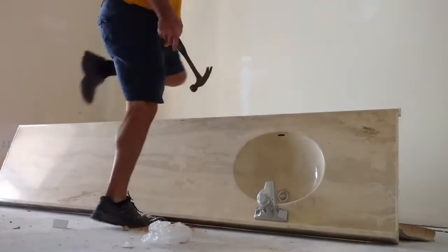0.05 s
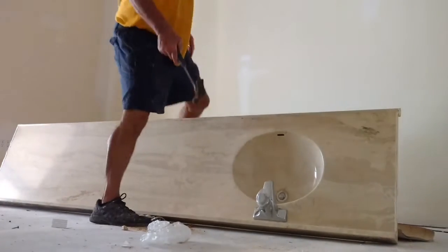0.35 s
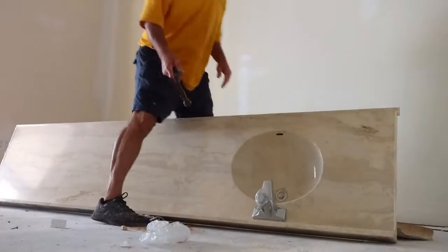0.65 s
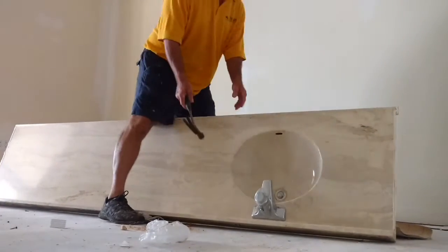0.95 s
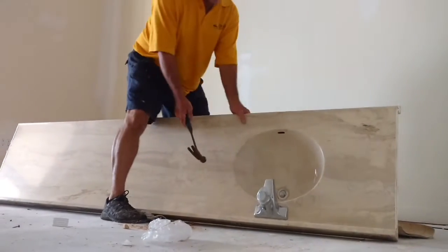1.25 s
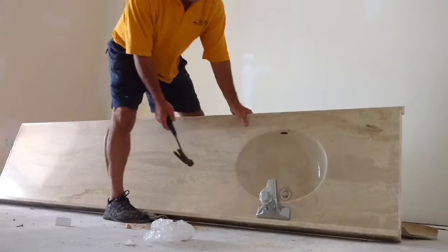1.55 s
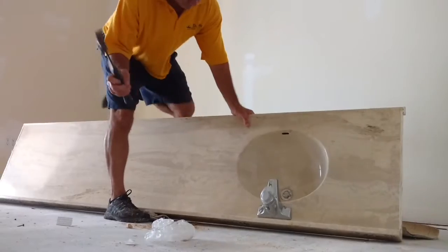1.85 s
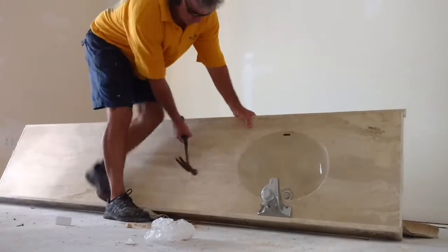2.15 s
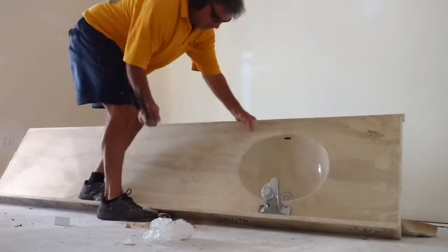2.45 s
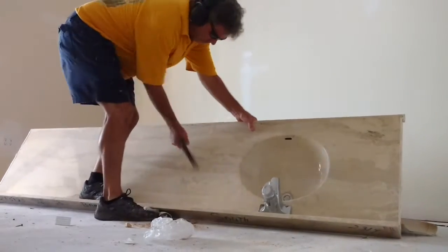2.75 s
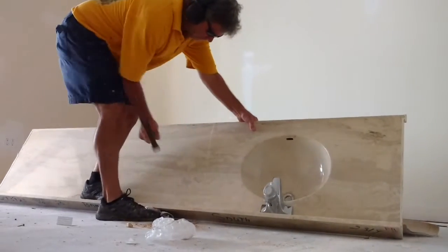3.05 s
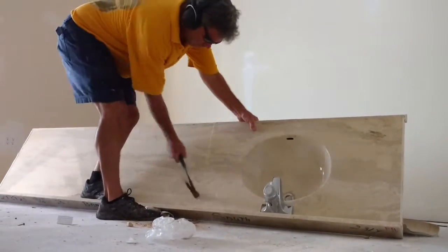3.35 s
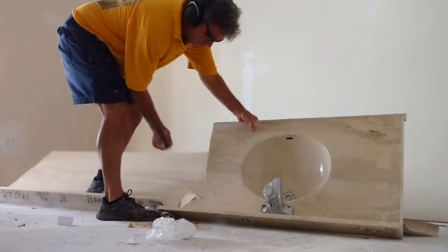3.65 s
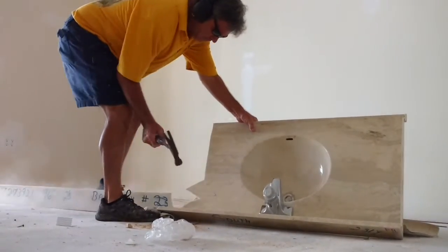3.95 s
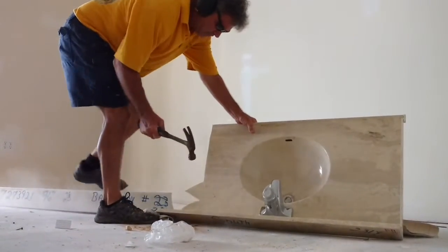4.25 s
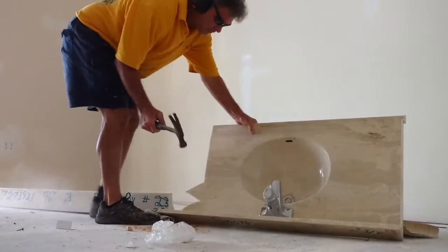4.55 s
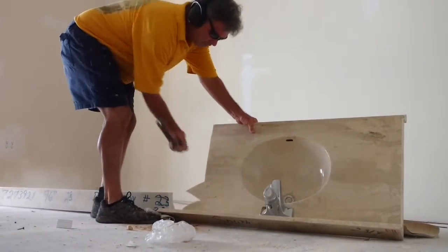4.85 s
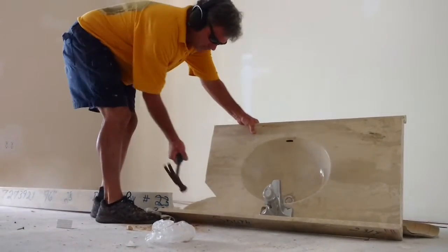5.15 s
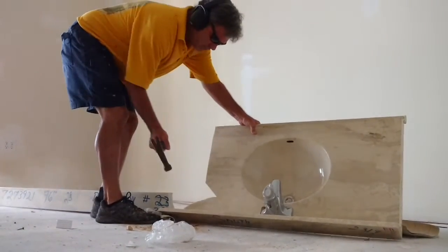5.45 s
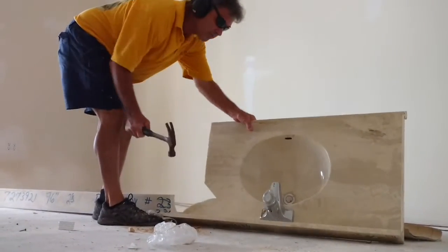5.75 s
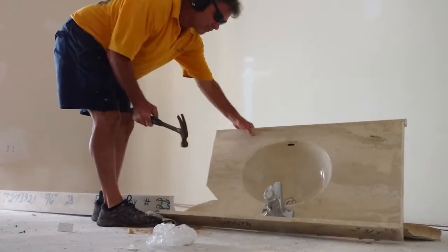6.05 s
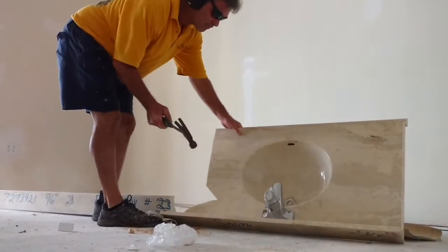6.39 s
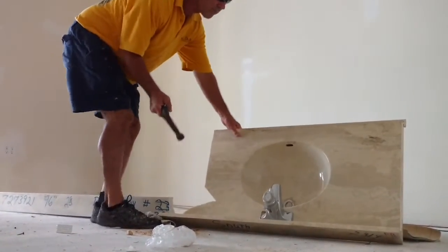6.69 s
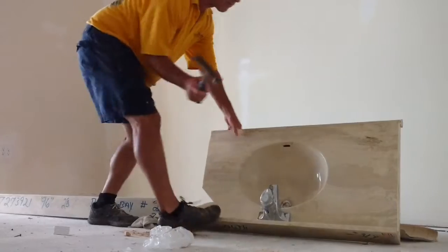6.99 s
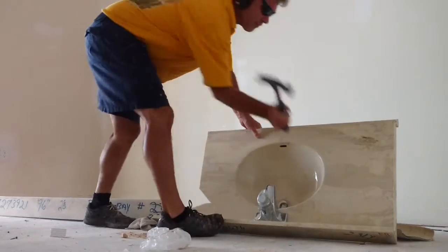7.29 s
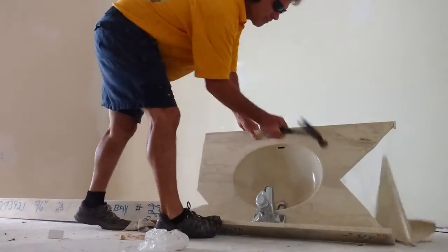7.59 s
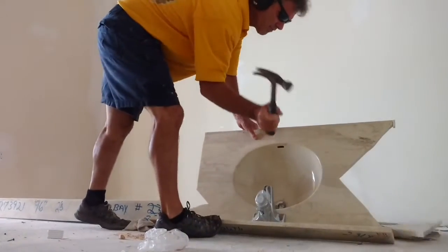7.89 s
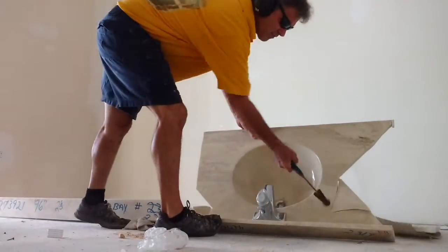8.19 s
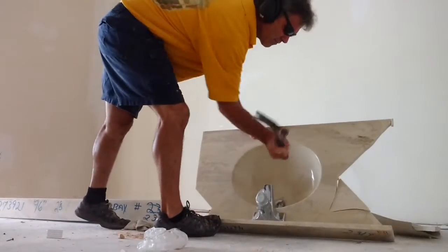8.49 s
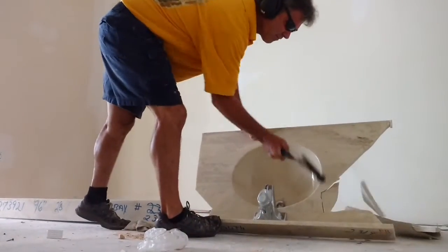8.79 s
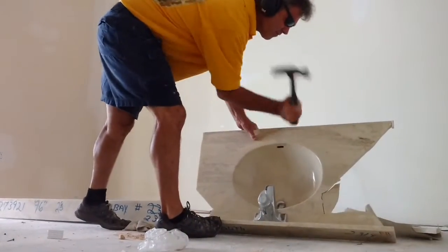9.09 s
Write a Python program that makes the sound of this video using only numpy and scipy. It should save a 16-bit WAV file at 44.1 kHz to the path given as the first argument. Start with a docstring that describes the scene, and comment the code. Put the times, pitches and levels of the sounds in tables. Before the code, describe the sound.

A hammer smashes a stone countertop in an empty, reverberant room, heard through a small microphone that distorts a little on the loudest hits. Gritty shoe scuffs, soft steps and rustling cloth come first. Four loud cracking blows follow, a slab section topples and bounces, and a lighter blow lands. The remaining piece rocks with low knocks, then three more sharp strikes ring out as a shard clatters on the floor.

```python
"""Shoes scuff on a gritty floor and clothes rustle in a bare, echoing room. Then a man breaks up a
cast-stone countertop with eight blows of a claw hammer: the slab cracks and rings, broken edges clack,
one half topples, the other rocks, shards drop. From where the microphone stands, the room is louder
than the direct sound. It is a small one: its port cuts evenly spaced notches and the blows overload it."""
import sys
import numpy as np
from scipy import signal
from scipy.fft import rfft, irfft, next_fast_len
from scipy.io import wavfile

SR = 44100
rng = np.random.default_rng(int(sys.argv[2]) if len(sys.argv) > 2 else 0)


def to_wav(sig):
    """Store sig (one row per channel, or 1-D mono) as 16-bit WAV at the path in sys.argv[1].

    Samples outside -1..1 are clipped; the rate is SR.
    """
    pcm = np.clip(np.atleast_2d(sig), -1, 1) * 32767
    pcm = np.round(pcm).astype(np.int16)
    wavfile.write(sys.argv[1], SR, pcm.T)  # frames by channels


N = 402633
PLACES = 4   # spots in the room, each with its own echoes
BURST = SR // 2   # samples in one short event
TIME = np.arange(BURST) / SR

# spectrum of stone cracking: f/Hz, level/dB
CRACK_COLOUR = [(40, -25), (130, -7.5), (260, 0), (500, 2), (900, 5), (1400, 1.5), (2000, -3.5),
                (3500, -10.5), (6200, -17.5), (8700, -25), (12000, -33), (16000, -40)]
# spectrum of a heavy piece knocking: f/Hz, level/dB
THUD_COLOUR = [(40, -11.5), (140, 4.5), (260, 12.5), (520, 8.5), (850, 4), (1400, -9.5), (2200, -13.5),
               (4000, -30), (8000, -38.5), (16000, -63.5)]


def from_db(db):
    """Decibels to amplitude."""
    return 10 ** (np.asarray(db) / 20)


def unit(x):
    """Scale to an energy of one."""
    return x / np.sqrt(np.sum(x ** 2) + 1e-20)


def burst(x, db, over_s=0.094):
    """Give a unit-energy sound the energy of a short stretch at the given level."""
    return from_db(db) * np.sqrt(over_s * SR) * x


def at_hz(points, hz):
    """Read a curve along a logarithmic frequency axis."""
    f, value = np.transpose(points)
    return np.interp(np.log(hz + 1), np.log(f), value)


def at_one_place(x):
    """A sound that comes from a single spot."""
    return np.eye(PLACES)[:, :1] * x


def add(track, s, sound):
    """Mix a sound in at a given time, dealing its parts to the places in random order."""
    start = max(round(s * SR), 0)
    track[:, start:start + sound.shape[-1]] += rng.permutation(sound)[:, :N - start]


def coloured(x, colour, bass_db=0, treble_db=0, bass_hz=550, treble_hz=1900, size=4096):
    """Causal filter of unit power gain with the given colour, then a bass and a treble shelf."""
    hz = np.fft.rfftfreq(size, 1 / SR)
    db = at_hz(colour, hz)
    db -= 10 * np.log10(np.mean(from_db(db) ** 2))
    db += bass_db / (1 + (hz / bass_hz) ** 4)
    db += treble_db * (1 - 1 / (1 + (hz / treble_hz) ** 4))
    cepstrum = irfft(np.log(from_db(db)))
    fold = 1 - np.sign(np.arange(size) - size // 2)   # minimum phase: nothing sounds early
    fold[0] = 1
    response = irfft(np.exp(rfft(cepstrum * fold)))[:size // 2]
    return signal.fftconvolve(x, response[None], axes=-1)[:, :x.shape[-1]]


def dying(x, t60s):
    """Let each band of a steady sound die away in its own time."""
    size = x.shape[-1]
    hz, t = np.fft.rfftfreq(size, 1 / SR), np.arange(size) / SR
    spectrum = rfft(x)
    centres, times = np.transpose(t60s)
    shares = [at_hz(np.c_[centres, row], hz) for row in np.eye(len(centres))]
    bands = [irfft(spectrum * share, size) for share in shares]
    return sum(band * from_db(-60 * t / t60) for band, t60 in zip(bands, times))


def mode(hz, t60, t=TIME):
    """A struck mode: a dying sine."""
    return np.sin(2 * np.pi * hz * t) * from_db(-60 * t / t60)


def grains(per_s, uneven_db):
    """Random clicks of uneven size, one row for each place they come from."""
    born = rng.random((PLACES, BURST)) < per_s / PLACES / SR
    return born * rng.choice([-1, 1], BURST) * from_db(uneven_db * rng.standard_normal(BURST))


def contact(spread_s, crackle_db):
    """One hard click, then a dying shower of tiny fractures all around it."""
    cracks = unit(grains(per_s=1200, uneven_db=5) * np.exp(-TIME / max(spread_s, 1e-3)))
    return unit(at_one_place(TIME == 0) + from_db(crackle_db) * cracks)


def room_tone(db=-64):
    """The faint, steady hush of the air."""
    # spectrum of the hush: f/Hz, level/dB
    hush_colour = [(30, -5), (120, -6.5), (500, -4.5), (1300, 0), (3000, -19), (8000, -28), (16000, -45)]
    return from_db(db) * coloured(rng.standard_normal((1, N)), hush_colour)


def room(places, direct_db=-3, early_db=-6, tail_gain=1.32, early_s=0.0097, build_s=0.0014):
    """Each spot reaches the microphone with its own wall echoes and tail; all share the standing waves."""
    # reverberation time by band: f/Hz, t60/s
    reverb_times = [(60, 0.63), (130, 0.64), (260, 0.85), (550, 1.094), (1300, 1.154), (2600, 0.8),
                    (5500, 0.81), (8500, 0.61), (14000, 0.37)]
    # strongest standing waves: f/Hz, level/dB, t60/s
    standing_waves = [(176, -32, 0.45), (269.5, -21.5, 0.76), (353, -33, 0.33), (456, -27.5, 1.5),
                      (499.5, -22.5, 1.5), (608.6, -28.5, 1.6), (682, -33.5, 0.78), (750, -23.5, 1.1),
                      (1262, -43, 0.72)]
    t = np.arange(3 * BURST) / SR
    shape = (PLACES, len(t))
    arrivals = rng.random(shape) < 500 / SR   # about 500 echoes a second
    echoes = arrivals * rng.standard_normal(shape) * np.exp(-t / early_s)
    tails = dying(rng.standard_normal(shape), reverb_times) * (1 - np.exp(-t / build_s))
    direct = from_db(direct_db) * (t == 0)
    ringing = sum(from_db(db) * unit(mode(hz, t60, t)) for hz, db, t60 in standing_waves)
    responses = [direct + ringing + from_db(early_db) * unit(echo) + tail_gain * unit(tail)
                 for echo, tail in zip(echoes, tails)]
    return sum(signal.fftconvolve(x, response)[:N] for x, response in zip(places, responses))


def clothes(fade_db_per_s=107.5):
    """Cloth rustles evenly through each spell of movement and fades on either side."""
    # spells of moving about: start/s, end/s, level/dB
    moves = [(0, 1.26, -53), (1.87, 2.25, -50.5), (7.1, 9.13, -59.5)]
    # spectrum of rubbing cloth: f/Hz, level/dB
    rustle_colour = [(30, 11), (80, -3), (200, 1.5), (500, -1), (1200, -3.5), (3500, -16), (7000, -18.5),
                     (11000, -26), (16000, -33.5)]
    t = np.arange(N) / SR
    level = sum(from_db(db - fade_db_per_s * np.abs(t - np.clip(t, start, end)))
                for start, end, db in moves)
    return at_one_place(level * coloured(rng.standard_normal((1, N)), rustle_colour))


def shoes():
    """Soles roll dense grit under a smooth stroke and come down with a dull thud."""
    # soles sliding: middle/s, half length/s, level/dB
    scuffs = [(0.265, 0.042, -29.5), (0.783, .08, -48), (0.971, 0.039, -34), (1.55, 0.038, -47),
              (6.06, .025, -63), (6.907, 0.053, -66.5)]
    # spectrum of rolling grit: f/Hz, level/dB
    scuff_colour = [(40, -18), (150, -10.5), (450, -2), (1000, -1.5), (2000, -4.5), (3500, -2.5),
                    (6200, -8), (9000, -14.5), (12000, -24.5), (16000, -41.5)]
    # soft footfalls: t/s, level/dB
    steps = [(.682, -51), (0.982, -40.5), (1.05, -42.5), (1.38, -56), (1.97, -33.5), (7.1, -64)]
    # spectrum of a footfall: f/Hz, level/dB
    step_colour = [(30, -36.5), (70, -21), (130, 2), (280, -5.5), (600, -22), (1500, -26), (16000, -80)]
    out = np.zeros((PLACES, N))
    for s, half_s, db in scuffs:
        grit = np.sqrt(BURST) * unit(grains(per_s=7000, uneven_db=1))
        stroke = np.exp(-((TIME - TIME.mean()) / half_s) ** 2)
        add(out, s - TIME.mean(), from_db(db) * coloured(grit * stroke, scuff_colour, treble_db=-3.5))
    for s, db in steps:
        add(out, s, burst(coloured(contact(spread_s=0.054, crackle_db=6.5), step_colour), db))
    return out


def clink(modes, uneven_db=2):
    """Every touch strikes each mode with a strength of its own."""
    tones = [from_db(db + uneven_db * rng.standard_normal()) * mode(hz, t60) for hz, db, t60 in modes]
    return at_one_place(unit(sum(tones)))


def debris(middling_chip_db=-52):
    """On the floor, chips snap underfoot, a shard clatters and clinks, a splinter tinkles."""
    # grit snapping under the soles: t/s, level/dB
    chips = [(0.2, -56), (.677, -42.5), (.866, -42.5), (6.234, -68.5), (7.057, -55), (7.265, -58)]
    # the shard lands and tips over: t/s, level/dB, rattling time/s
    shard_falls = [(8.0, -31.5, 0.012), (8.07, -40.5, 0.022), (8.207, -34.5, 0.021)]
    # its modes: f/Hz, level/dB, t60/s
    shard_modes = [(1100, -15, .25), (1140, -8, 0.21), (1542, 2, 0.31), (1875, 11, 0.12), (2905, 6, .12),
                   (3530, 9, 0.053), (4260, 9, 0.073), (6137, -25, .1), (6589, -24, .1), (9350, -30, 0.093)]
    # the splinter lands: t/s, level/dB
    splinter_falls = [(5.28, -62.5), (5.32, -62)]
    # its modes: f/Hz, level/dB, t60/s
    splinter_modes = [(10670, 7, .1), (10800, 0, .1), (12500, -3, 0.091), (14200, -5, .12)]
    out = np.zeros((PLACES, N))
    for s, db in chips:
        size_db = db - middling_chip_db   # a bigger chip rattles longer and is duller
        snap = contact(spread_s=0.0052 * from_db(0.9 * size_db), crackle_db=17.5)
        add(out, s, burst(coloured(snap, CRACK_COLOUR, bass_db=-2, treble_db=5.5 - 0.16 * size_db), db))
    for s, db, spread_s in shard_falls:
        clatter = coloured(contact(spread_s, crackle_db=8), CRACK_COLOUR, bass_db=-7, treble_db=4)
        add(out, s, burst(unit(clatter + from_db(-4) * clink(shard_modes)), db))
    for s, db in splinter_falls:
        add(out, s, burst(clink(splinter_modes), db))
    return out


def plate(mean_spacing_hz=14):
    """A broken plate rings in evenly dense modes, at new pitches on every strike."""
    # ringing time of the stone by band: f/Hz, t60/s
    ring_times = [(100, .2), (1000, .2), (2500, .05), (14000, .02)]
    bins = BURST // 2 + 1
    is_mode = rng.random(bins) < SR / BURST / mean_spacing_hz
    phases = np.exp(2j * np.pi * rng.random(bins))
    ring = unit(dying(irfft(is_mode * phases, BURST), ring_times))
    return at_one_place(ring)[::-1]   # it radiates away from the point struck


def struck_slab(colour, modes, spread_s, bass_db, treble_db, crackle_db=4.5, ring_db=-6):
    """A contact cracks, sets the plate's many modes going and brings out its main tones."""
    stone = unit(contact(spread_s, crackle_db) + from_db(ring_db) * plate())
    tones = sum(from_db(db) * unit(mode(hz, t60)) for hz, db, t60 in modes)
    return coloured(stone, colour, bass_db, treble_db) + at_one_place(tones)


def nudge(s=1.965, db=-41.5):
    """A leg nudges the whole slab, which hums."""
    # modes of the unbroken slab: f/Hz, level/dB, t60/s
    modes = [(263, 6, .3), (1400, -7.5, .25)]
    out = np.zeros((PLACES, N))
    hum = struck_slab(THUD_COLOUR, modes, spread_s=0.2, bass_db=-0.5, treble_db=11.5, crackle_db=15)
    add(out, s, burst(hum, db))
    return out


def broken_edges():
    """The freshly broken edges clack together."""
    # edges meeting: t/s, level/dB, treble/dB
    clacks = [(2.39, -19.5, -13.5), (4.07, -28, -5), (4.198, -26.5, -9), (5.315, -33, -2),
              (5.459, -40, -4.5)]
    # the modes they strike: f/Hz, level/dB, t60/s
    modes = [(1290, -20.5, .25), (1627, -11, 0.18)]
    out = np.zeros((PLACES, N))
    for s, db, treble_db in clacks:
        clack = struck_slab(CRACK_COLOUR, modes, spread_s=0.034, bass_db=-7, treble_db=treble_db)
        add(out, s, burst(clack, db))
    return out


def toppling_half(hard_landing_db=-17, ring_db_per_db=0.17):
    """The loose half slaps down on the floor and bounces; a softer landing cracks less and rings more."""
    # slap and bounces: t/s, level/dB
    landings = [(3.975, -15), (4.07, -24.5), (4.21, -30), (4.668, -45.5)]
    # modes of the loose half: f/Hz, level/dB, t60/s
    modes = [(609, -21.5, 0.28), (752, -7.5, .25), (864, -19.5, .25)]
    out = np.zeros((PLACES, N))
    for s, db in landings:
        lift_db = ring_db_per_db * (hard_landing_db - db)
        lifted = [(hz, mode_db + lift_db, t60) for hz, mode_db, t60 in modes]
        slap = struck_slab(THUD_COLOUR, lifted, spread_s=0.038, bass_db=-12.5, treble_db=3)
        add(out, s, burst(slap, db))
    return out


def rocking_half(rebound_s=0.11, loss_db=14, dulling_db=25):
    """The standing half rocks on its edge and each time drops back once, softer and duller."""
    # the edge bumps down: t/s, level/dB, treble/dB
    rocks = [(5.75, -35.5, 2), (6.205, -43.5, -5), (6.274, -31, -12.5)]
    # modes of the standing half: f/Hz, level/dB, t60/s
    modes = [(175, -12, 0.33), (531, -3, 0.2), (783, -13, 0.17)]
    out = np.zeros((PLACES, N))
    for s, db, treble_db in rocks:
        for rebound in range(2):
            top_db = treble_db - rebound * dulling_db
            bump = struck_slab(THUD_COLOUR, modes, spread_s=0.015, bass_db=-0.5, treble_db=top_db)
            add(out, s + rebound * rebound_s, burst(bump, db - rebound * loss_db))
    return out


def hammer(tone_t60=0.19, thump_db=3, bass_loss_db_per_s=111):
    """Steel on stone: a short crack keeps its thump, a long break loses it."""
    # blows, each leaving a new main tone: t/s, level/dB, treble/dB, cracking time/s, f/Hz, tone/dB
    blows = [(2.257, -12.5, 5, 0.049, 1286, -10.5), (2.929, -13.5, 2.5, 0.034, 1000, -36),
             (3.475, -14.5, 3, 0.029, 714, -16), (3.934, -15.5, 1.5, 0.051, 823, -25),
             (5.101, -22, 7.5, 0.0025, 521, -3.5), (7.493, -19, 9.5, 0.022, 1608, -12),
             (8.234, -22, 10, 0.011, 1064, -22), (8.736, -22.5, 12.5, 0.0045, 1200, -17)]
    out = np.zeros((PLACES, N))
    for s, db, treble_db, spread_s, tone_hz, tone_db in blows:
        bass_db = thump_db - bass_loss_db_per_s * spread_s
        tone = [(tone_hz, tone_db, tone_t60)]
        blow = struck_slab(CRACK_COLOUR, tone, spread_s, bass_db, treble_db, crackle_db=3, ring_db=-9)
        add(out, s, burst(blow, db))
    return out


def scene():
    """Everything sounds in the same bare room, over a faint hush."""
    hush = room_tone()
    stone = hammer() + nudge() + broken_edges() + toppling_half() + rocking_half() + debris()
    return room(stone + shoes() + clothes()) + hush


def record(dry, notch_spacing_hz=2488, echo_gain=0.74, ceiling=0.32, hardness=7.2):
    """An inverted echo in the microphone port cuts notches; peaks flatten; bottom and top are cut."""
    size = 2 * next_fast_len(N // 2 + 999)
    hz = np.fft.rfftfreq(size, 1 / SR)
    port = (1 - echo_gain * np.exp(-2j * np.pi * hz / notch_spacing_hz)) / (1 + echo_gain)
    notched = irfft(rfft(dry, size) * port)[:, :N]
    clipped = notched / (1 + np.abs(notched / ceiling) ** hardness) ** (1 / hardness)
    low_cut = signal.butter(1, 40, "high", fs=SR)
    high_cut = signal.ellip(10, 0.1, 80, 15900, fs=SR, output="sos")
    return signal.sosfilt(high_cut, signal.lfilter(*low_cut, clipped))


dry = scene()
out = record(dry)
to_wav(out)
```